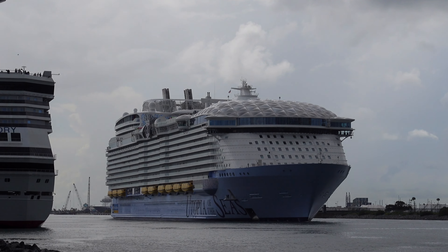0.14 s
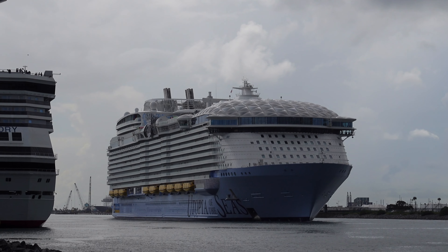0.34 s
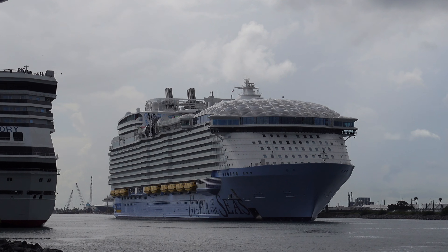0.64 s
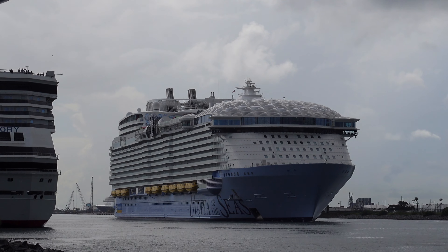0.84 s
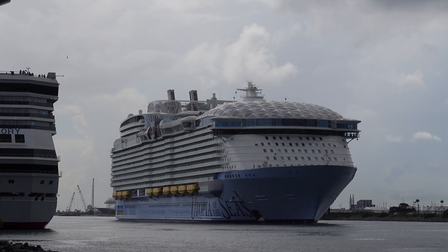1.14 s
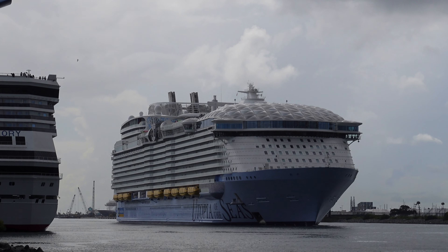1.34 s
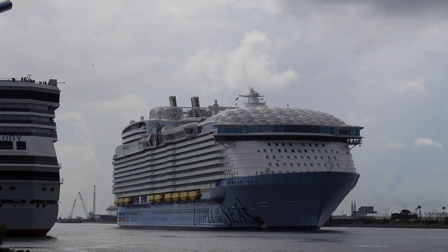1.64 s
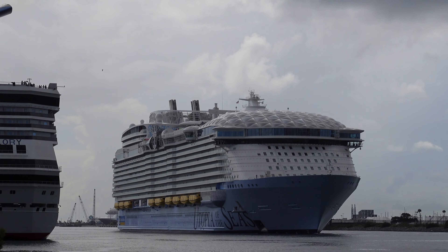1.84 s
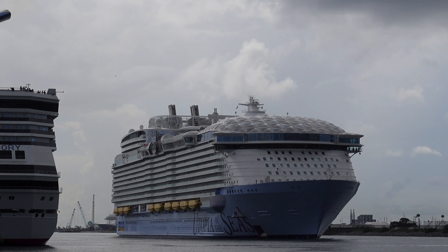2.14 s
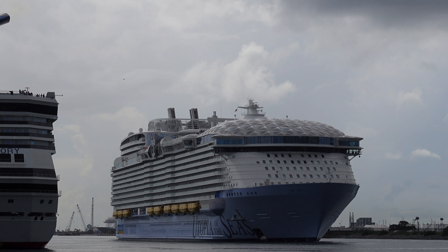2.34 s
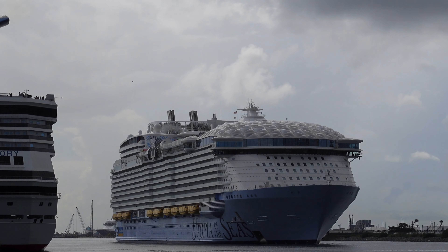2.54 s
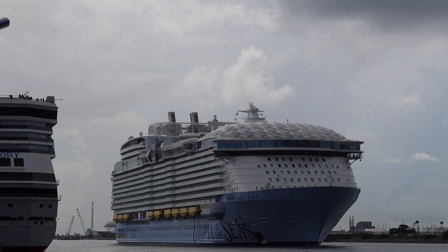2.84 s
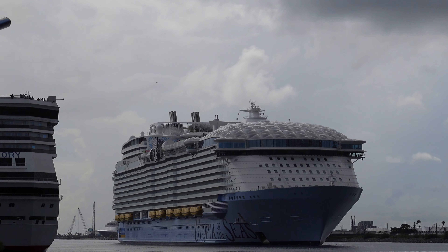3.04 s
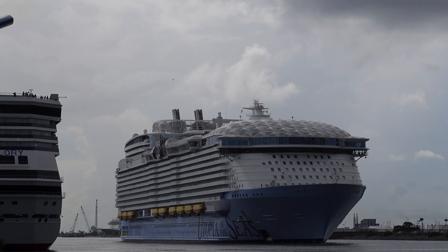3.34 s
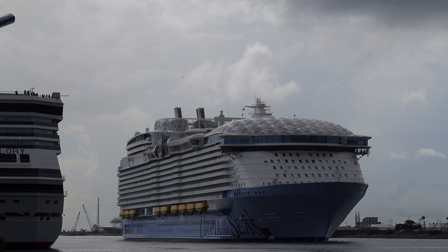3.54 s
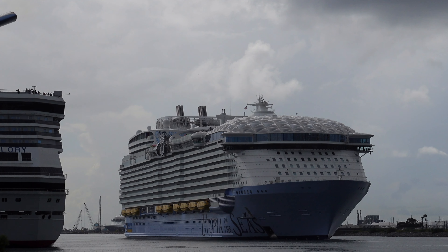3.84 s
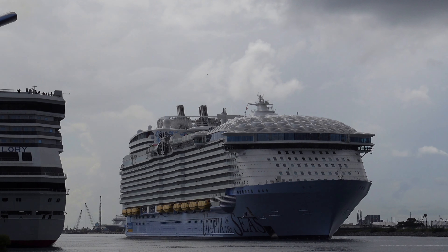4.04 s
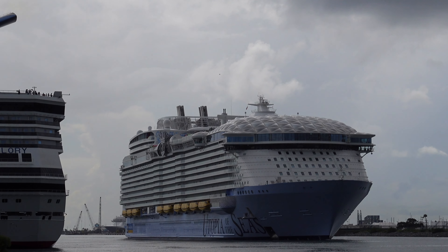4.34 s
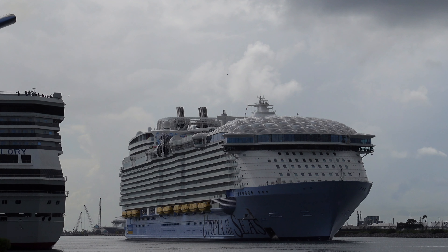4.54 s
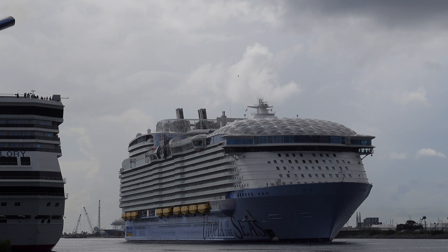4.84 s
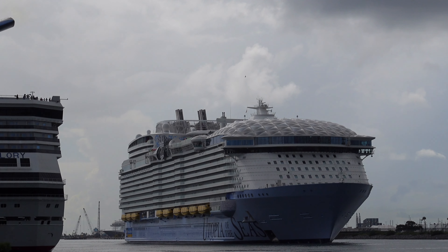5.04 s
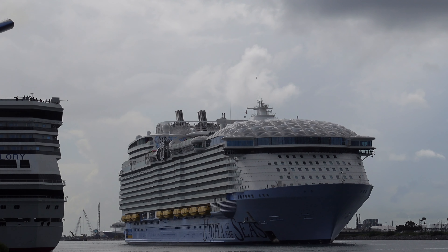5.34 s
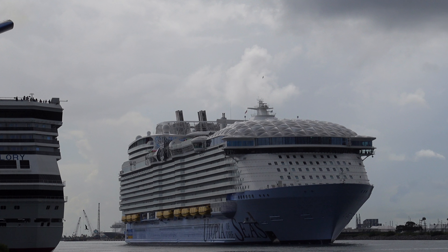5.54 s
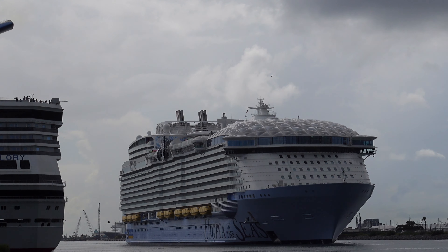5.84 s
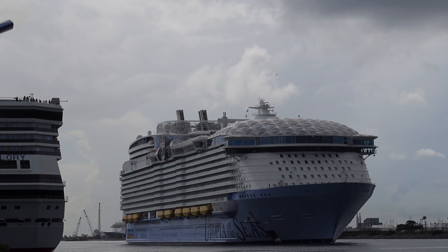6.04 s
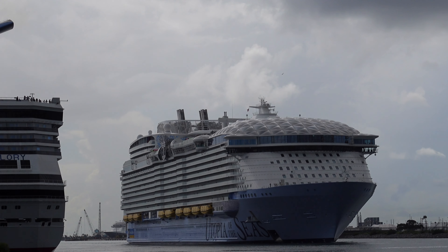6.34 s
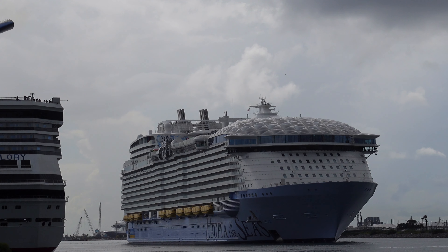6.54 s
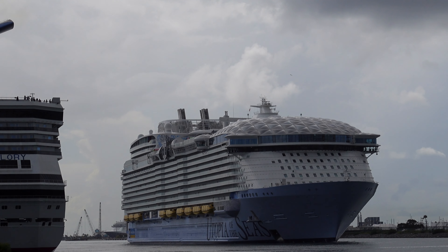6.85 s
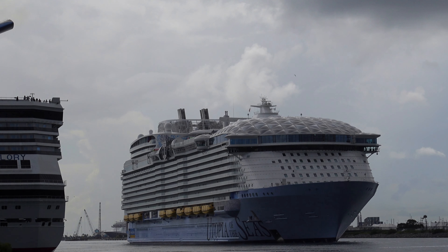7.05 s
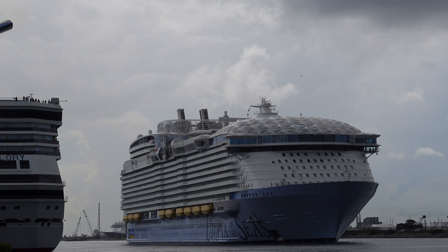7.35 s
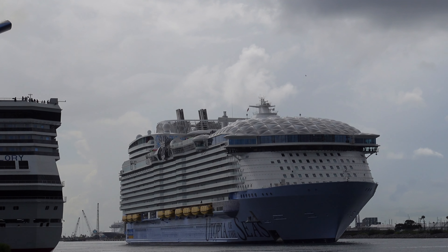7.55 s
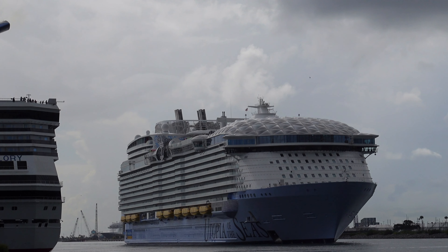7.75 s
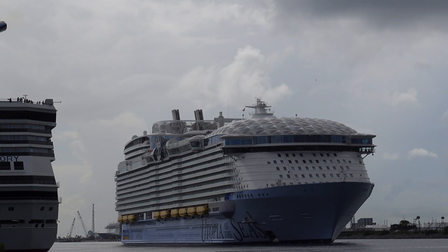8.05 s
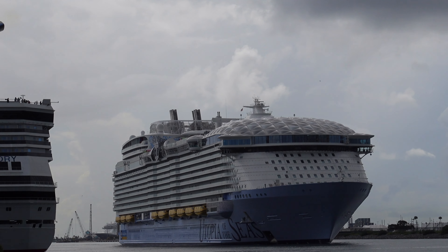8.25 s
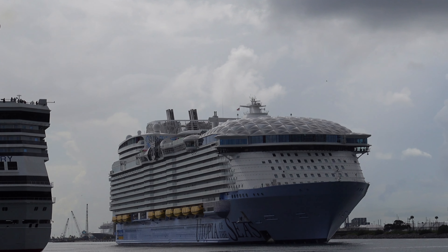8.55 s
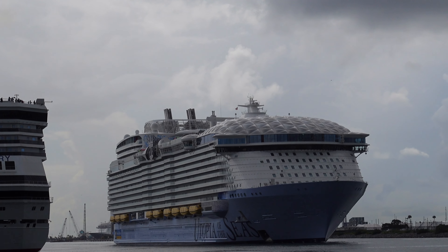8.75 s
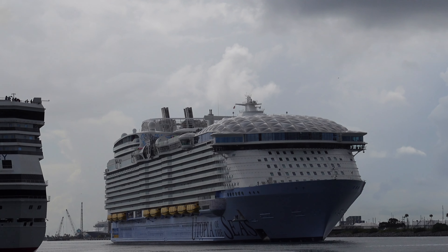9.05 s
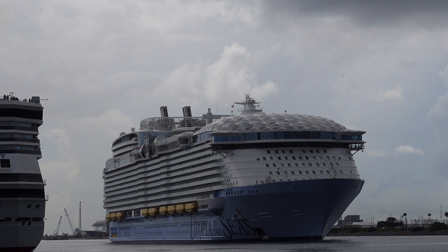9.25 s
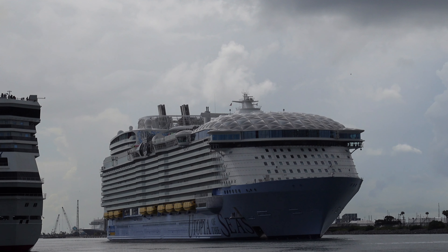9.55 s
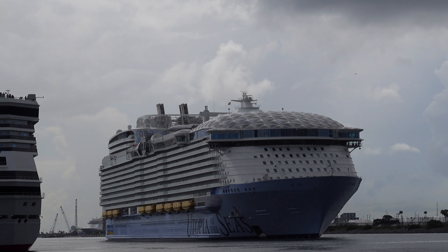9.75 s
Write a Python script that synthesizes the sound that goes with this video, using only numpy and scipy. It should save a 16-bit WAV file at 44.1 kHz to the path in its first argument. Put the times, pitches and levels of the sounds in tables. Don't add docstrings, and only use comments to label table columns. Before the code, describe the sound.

Loud low ship's horn, two close pitches beating into a gritty brassy drone, its brightness slowly shifting as the wind carries it. The blast stops, wind flutters and bumps against the microphone over a faint harbour hum, then a second long blast starts and continues to the cut. Open harbour, distant source, heavy sound with slight distortion.

```python
import sys
import numpy as np
from scipy import signal
from scipy.fft import rfft, irfft
from scipy.io import wavfile

SR = 44100
rng = np.random.default_rng(int(sys.argv[2]) if len(sys.argv) > 2 else 0)


def waveform_to_disk(signal):
    frames = np.transpose(np.atleast_2d(signal))
    scaled = np.clip(frames, -1, 1) * 32767
    samples = np.round(scaled).astype(np.int16)
    wavfile.write(sys.argv[1], SR, samples)


def boost(x):
    u = np.asarray(x, float) / 20
    return 10 ** u


N = 436590
BRIGHT_HZ, DULL_HZ = 91.5, 70.54
VALVE_OPENING, VALVE_RISE_S, VALVE_FALL_S = 0.92, 0.062, 0.043


# (frequency [Hz], level [dB])
BRIGHT_PULSE = [(30, -68), (91.5, -15), (183, 2.5), (275, -5), (366, -4), (550, 2.5), (730, 1), (1000, 1),
                (1500, -3), (2200, -9.5), (3000, -13.5), (4500, -21.5), (5500, -35), (8000, -62)]
# (time [s], arrival within the cycle [ms])
TRAVEL = [(0.0, 5.78), (0.6, 6.16), (1.25, 6.62), (2.0, 7.06), (2.9, 7.55), (3.45, 7.4), (3.8, 7.45),
          (4.08, 7.39), (5.4, 0.91), (5.75, 0.8), (6.05, 0.75), (6.5, 0.81), (7.0, 0.77), (7.4, 0.91),
          (8.0, 1.09), (8.35, 0.87), (9.2, 0.22), (9.9, -0.05)]
# (time [s], late copies [dB], fading near 280 Hz [dB])
TURBULENCE = [(0, -34.5, 2), (1.5, -45, 2.5), (2.8, -42.5, 6), (4.1, -42.5, 5), (5.4, -41.5, 2),
              (6, -44, -0.5), (6.6, -33, 1.9), (7.5, -44, -12), (8.1, -39, 0), (9.1, -45.5, -2.5),
              (9.9, -41, 2.4)]


def bright_horn(front_db, push_ms):
    turns = 2 * np.pi * DULL_HZ * np.arange(N) / SR
    arrival = in_time(TRAVEL)[0] + push_ms + 0.027 * np.sin(turns)
    sway = 1 + 0.13 * np.cos(turns)
    late_db, fade_db = in_time(TURBULENCE)

    period = cycle(BRIGHT_PULSE, BRIGHT_HZ, first=4, last=85)
    flutter_db = 2.3 * np.tanh(drift(42, count=1))
    port_db = np.array([[-0.4], [0.4]])
    rays = eddy_rays(period, arrival) * sway * boost(-23.0 + flutter_db + port_db)
    late = scattered(period, BRIGHT_HZ, arrival, spread_ms=2.2, wander_ms=0.3, count=5)
    short = rays + boost(late_db) * late
    mellow = signal.sosfilt(signal.butter(2, 1100, fs=SR, output="sos"), short)
    crack = short - mellow

    long = heard(-cycle(BRIGHT_PULSE, BRIGHT_HZ, first=1, last=2), BRIGHT_HZ, arrival + 0.15)
    third = heard(-cycle(BRIGHT_PULSE, BRIGHT_HZ, first=3, last=3), BRIGHT_HZ, arrival + 1.1)
    long += boost(fade_db) * third
    opening = valve()
    return boost(front_db - 3.0) * long + opening ** 0.92 * mellow + opening ** 4.33 * crack


# (middle [s], length [s], delay behind the front [ms], slide [ms per s], strength [ratio])
FIRST_RAYS = [(0.24, 2.34, 0.05, -0.04, 0.22), (0.27, 0.91, 0.8, -0.09, -0.09),
              (0.32, 1.12, 0.66, -0.03, -0.09), (0.48, 1.47, 0.08, 0.33, 0.09),
              (0.64, 1.61, -0.23, 0.18, 0.1), (0.72, 0.83, -0.08, -0.2, 0.14),
              (1.12, 2.37, 0.35, 0.02, 0.11), (1.2, 1.81, 0.47, -0.0, 0.07),
              (1.43, 2.1, 0.97, -0.44, -0.05), (1.45, 2.93, 0.11, -0.09, 0.24),
              (1.52, 2.53, 1.41, -0.48, -0.07), (1.54, 2.78, 1.55, -0.46, -0.06),
              (1.77, 2.2, 0.95, -0.46, -0.1), (2.02, 2.52, -0.2, 0.01, -0.05),
              (2.34, 2.32, 0.83, -0.48, -0.07), (2.4, 2.42, 0.28, 0.05, 0.18),
              (2.98, 2.35, 0.17, 0.01, 0.27), (3.13, 2.28, 0.03, -0.44, -0.09),
              (3.46, 1.49, 0.05, -0.0, 0.37)]
# (middle [s], length [s], delay behind the front [ms], slide [ms per s], strength [ratio])
SECOND_RAYS = [(5.63, 1.12, -0.0, -0.16, 0.27), (5.87, 2.36, 0.57, 0.56, 0.18),
               (6.15, 1.27, 0.88, 0.81, 0.1), (6.23, 2.34, 0.34, -0.03, 0.14),
               (6.3, 2.08, 0.23, 0.41, 0.08), (6.3, 2.46, -0.22, 0.04, -0.05),
               (6.5, 1.89, 0.46, -0.21, 0.11), (6.6, 1.5, 0.57, -0.22, 0.09),
               (6.71, 2.53, 0.05, -0.09, 0.19), (6.75, 1.69, 0.12, -0.33, -0.08),
               (7.21, 2.84, 0.14, -0.09, 0.22), (7.73, 1.85, 0.38, 0.62, 0.05),
               (7.77, 2.28, 1.35, 0.0, 0.05), (7.87, 2.14, 0.33, 0.15, 0.13),
               (7.91, 1.97, 0.25, -0.62, -0.06), (7.98, 0.71, 0.22, -0.01, 0.21),
               (8.34, 1.71, 0.52, 0.18, 0.1), (8.59, 2.92, 1.08, 0.51, -0.03),
               (9.01, 2.18, -0.19, -0.02, -0.05), (9.45, 1.87, 0.78, 0.8, 0.07),
               (9.48, 0.68, 0.97, 0.7, 0.08), (9.51, 1.21, 1.75, 0.07, -0.07),
               (9.68, 2.45, 1.98, -0.29, -0.05)]


def eddy_rays(period, arrival):
    out = np.zeros(N)
    jitter_ms = 0.008 * drift(20, count=3)
    for (on, off), rays in zip(BLASTS, (FIRST_RAYS, SECOND_RAYS)):
        for k, (middle, lasts, behind_ms, slide, strength) in enumerate(rays):
            start = int(max(middle - lasts / 2, on, 0) * SR)
            stop = min(int(min(middle + lasts / 2, off + 0.1) * SR), N)
            since = np.arange(start, stop) / SR - middle
            late = arrival[start:stop] + jitter_ms[k % 3, start:stop] + behind_ms + slide * since
            fade = np.clip((lasts / 2 - abs(since)) / 0.2, 0, 1)
            out[start:stop] += strength * fade * heard(period, BRIGHT_HZ, late, start, stop)
    return out


# (frequency [Hz], level [dB])
DULL_PULSE = [(30, -50), (70, -23.5), (141, -3), (212, 1.5), (282, -6), (353, -7.5), (424, -14.5),
              (500, -17), (700, -20.5), (1200, -38), (2500, -37), (5000, -43), (8000, -91)]


def dull_horn(front_db):
    lag_ms = 0.6 * drift(0.3, count=1)[0]
    fade_db = in_time(TURBULENCE)[1]
    lows = heard(cycle(DULL_PULSE, DULL_HZ, first=1, last=3), DULL_HZ, lag_ms)
    lows += boost(fade_db) * heard(cycle(DULL_PULSE, DULL_HZ, first=4, last=5), DULL_HZ, lag_ms)
    upper = cycle(DULL_PULSE, DULL_HZ, first=6, last=110)
    broken = scattered(upper, DULL_HZ, lag_ms, spread_ms=0.9, wander_ms=0.3, count=3)
    direct = 0.62 * heard(cycle(DULL_PULSE, DULL_HZ, first=6, last=20), DULL_HZ, lag_ms)
    return boost(front_db) * (lows + valve() * (broken + direct))


def combination_tones(low):
    turns = 2 * np.pi * BRIGHT_HZ * np.arange(N) / SR
    sum_band = signal.butter(6, [520, 1100], "band", fs=SR, output="sos")
    difference_band = signal.butter(4, [205, 310], "band", fs=SR, output="sos")
    sums = signal.sosfilt(sum_band, low * np.sin(2 * turns))
    differences = signal.sosfilt(difference_band, low * np.sin(4 * turns))
    return boost(0.5) * sums + boost(3.5) * differences


# (frequency [Hz], level [dB])
RUSH_COLOUR = [(100, -30), (300, -3), (700, 0), (1500, -10), (3000, -25), (5000, -38), (6500, -54),
               (8000, -80), (16000, -100)]


def rush():
    level_db = -32 + inside(late_s=0.024, over_s=0, rise=198, fall=159)
    return boost(level_db + 1.6 * drift(16, count=1)) * coloured(RUSH_COLOUR, likeness=0.85)


def shore_echo(x, t60, cut_hz):
    s = np.arange(int(0.9 * SR)) / SR
    tail = rng.standard_normal((2, len(s))) * boost(-60 * s / t60) * (s > 0.004)
    tail = signal.sosfilt(signal.butter(1, cut_hz, fs=SR, output="sos"), tail)
    tail = tail / np.sqrt((tail ** 2).sum(1, keepdims=True))
    broken = x * drift(45, count=2)
    return signal.fftconvolve(broken, tail, axes=1)[:, :N]


# (time [s], level [dB])
GUSTS = [(0, -34.5), (1.5, -32.5), (2.2, -33), (2.5, -45), (3.7, -43), (4.15, -36), (4.55, -39.5),
         (4.9, -34.5), (5.0, -31), (5.19, -30), (5.24, -42), (5.36, -33), (6.4, -32), (7.6, -30),
         (9.2, -28.5), (9.9, -32)]
# (time [s], lift [dB], length [s])
BUFFETS = [(1.6, 6, 0.034), (2.14, 2.5, 0.043), (4.28, 8, 0.01), (4.482, 4, .015), (4.68, 9, .02),
           (4.803, 11, .015), (5.02, 4, 0.023), (5.167, 0.5, 0.017), (6.03, 8, 0.014), (6.5, 6.5, 0.023),
           (6.889, 6, 0.023), (7.272, 3.5, 0.034)]
# (frequency [Hz], level [dB per Hz])
WIND_COLOUR = [(20, -45), (45, -30.5), (80, -12), (130, -7), (220, -7.5), (350, -12.5), (600, -22),
               (1200, -50), (3000, -71), (6000, -100)]
# (frequency [Hz], left-right likeness [-1 to 1])
WIND_LIKENESS = [(40, 0.66), (80, 0.14), (200, -0.41), (500, -0.85), (2000, -1)]


def wind(lumpy_db):
    gust_db = in_time(GUSTS) + bumps(BUFFETS)
    out, edges = 0, 18 * 2 ** np.arange(0, 8.1, 0.5)
    white = rng.standard_normal((2, 2, N))
    together, own = drift(32, count=2), drift(25, count=4)
    opposite = np.array([[1], [-1]])
    for k, (low, high) in enumerate(zip(edges, edges[1:])):
        band = signal.butter(2, [low, high], "band", fs=SR, output="sos")
        mid, side = signal.sosfilt(band, white[k % 2])
        hz = np.sqrt(low * high)
        alike = np.clip(at_hz(WIND_LIKENESS, hz), -1, 1)
        ports = np.sqrt(1 + alike) * mid + np.sqrt(1 - alike) * side * opposite
        lumps = np.clip(together + 0.5 * own[k % 4], -3, 2)
        out = out + boost(at_hz(WIND_COLOUR, hz) + lumpy_db * lumps) * ports
    balance_db = (1.4 + 1.8 * drift(2.0, count=1)) * opposite
    return out / out.std() * boost(gust_db + 9.0 + balance_db)


# (time [s], level [dB])
TICKS = [
    (4.445, -60),
    (5.01, -63),
    (5.18, -57),
]


def ticks():
    swells = bumps([(at, boost(db), 0.0008) for at, db in TICKS])
    return swells * np.sin(2 * np.pi * 4200 * np.arange(N) / SR)


# (frequency [Hz], level [dB per Hz])
HARBOUR_COLOUR = [(60, -9), (300, -3), (800, -6.5), (2000, -27.5), (5000, -46.5), (8000, -67),
                  (16000, -78.5)]


def harbour():
    return boost(-40.5) * coloured(HARBOUR_COLOUR, likeness=0.4)


def coloured(spectrum, likeness):
    hz = np.arange(N // 2 + 1) * SR / N + 1
    mid, side = irfft(rfft(rng.standard_normal((2, N))) * boost(at_hz(spectrum, hz)), N)
    width = np.sqrt((1 - likeness) / (1 + likeness))
    ports = mid + width * side * np.array([[1], [-1]])
    return ports / ports.std()


def cycle(bell, pitch_hz, first, last):
    grid = np.arange(4097) * SR / 8192
    cepstrum = irfft(at_hz(bell, grid + 1) * np.log(10) / 20)
    cepstrum[1:4096] *= 2
    cepstrum[4097:] = 0
    pulse = np.exp(rfft(cepstrum))
    hz = np.arange(first, last + 1) * pitch_hz
    orders = np.zeros(1025, complex)
    orders[first:last + 1] = np.interp(hz, grid, pulse.real) + 1j * np.interp(hz, grid, pulse.imag)
    return -irfft(orders) * 1024 * np.sqrt(2)


def heard(period, pitch_hz, delay_ms, start=0, stop=N):
    place = ((np.arange(start, stop) / SR - delay_ms / 1000) * pitch_hz + 1) * 2048
    whole = place.astype(int)
    step = np.diff(period, append=period[0])
    return period[whole & 2047] + (place - whole) * step[whole & 2047]


def scattered(period, pitch_hz, lead_ms, spread_ms, wander_ms, count):
    spread = spread_ms * rng.exponential(1, (count, 1))
    late = lead_ms + spread + wander_ms * drift(0.424, count)
    twinkle = drift(2.01, count)
    side = 0.5 * rng.uniform(-0.93, 1, count)
    rays = np.array([heard(period, pitch_hz, ms) for ms in late]) * twinkle
    return np.array([1 + side, 1 - side]) @ rays / np.sqrt(count)


def valve():
    slope = inside(VALVE_RISE_S, 0, 1 / VALVE_RISE_S, 1 / VALVE_FALL_S)
    return VALVE_OPENING * np.maximum(0, 1 + slope)


# (valve opens [s], valve shuts [s])
BLASTS = [
    (-1, 4.045),
    (5.383, 11),
]


def inside(late_s, over_s, rise, fall):
    s = np.arange(N) / SR
    slopes = []
    for on, off in BLASTS:
        slope = np.minimum(rise * (s - on - late_s), fall * (off + over_s - s))
        slopes.append(np.minimum(0, slope))
    return np.max(slopes, axis=0)


def drift(rate, count):
    r = np.exp(-80 * np.pi * rate / SR)
    chance = rng.standard_normal((count, N // 40 + 2002))
    slow = signal.lfilter([1], [1, -2 * r, r * r], chance)[:, 2000:]
    return np.array([np.interp(np.arange(N) / 40, np.arange(len(s)), s / s.std()) for s in slow])


def bumps(rows):
    out = np.zeros(N)
    for at, height, lasts in rows:
        near = np.arange(int((at - 3 * lasts) * SR), int((at + 3 * lasts) * SR))
        out[near] += height * np.exp(-((near / SR - at) / lasts) ** 2)
    return out


def in_time(rows):
    s, *columns = np.transpose(rows)
    return np.array([np.interp(np.arange(N) / SR, s, c) for c in columns])


def at_hz(points, hz):
    table_hz, level = np.transpose(points)
    return np.interp(np.log(hz), np.log(table_hz), level)


# (time [s], bright horn's second order [dB], dull horn's third order [dB])
FRONT = [
    [(0.0, -29, -21.5), (0.02, -21.5, -26), (0.58, -19.5, -26), (1.83, -21, -27.5), (2.25, -25, -31.5),
     (3.25, -25, -29.5), (4.04, -21, -30)],
    [(5.46, -20.5, -28), (5.48, -22.5, -28.5), (6.1, -18, -26.5), (9.13, -22.5, -28), (9.34, -29.5, -34),
     (9.44, -21.5, -35), (9.9, -27, -25)],
]


def scene():
    ringing_db = inside(late_s=0.024, over_s=0.032, rise=277, fall=213)
    bright_db, dull_db = in_time(sum(FRONT, [])) + ringing_db
    low = dull_horn(dull_db)
    horns = low + bright_horn(bright_db, push_ms=-0.15 * low[0])
    horns = horns + combination_tones(low)
    echo = boost(-27.5) * shore_echo(horns, t60=0.31, cut_hz=2600)
    return horns + rush() + echo + wind(lumpy_db=3.0) + ticks() + harbour()


def top_cut(x):
    return signal.sosfilt(signal.butter(12, 15700, fs=SR, output="sos"), x)


def record(dry):
    uneven = 0.032 * dry ** 2 - 0.14 * dry ** 3
    bent = dry + signal.sosfilt(signal.butter(2, 150, "high", fs=SR, output="sos"), uneven)
    squeezed = np.tanh(bent / 1.6) * 1.6 + 0.3 * np.maximum(-0.72 - bent, 0)
    hiss = boost(-88.0) * rng.standard_normal(dry.shape)
    return top_cut(squeezed + hiss)


dry = scene()
out = record(dry)
waveform_to_disk(out)
```